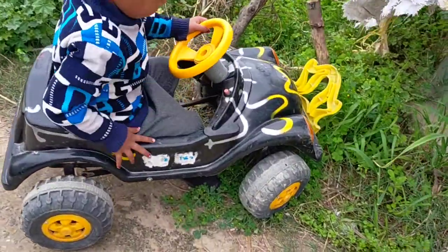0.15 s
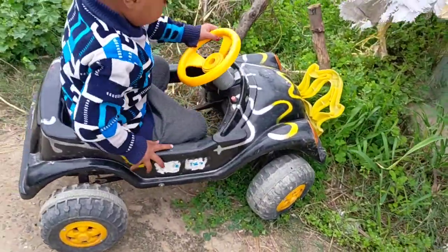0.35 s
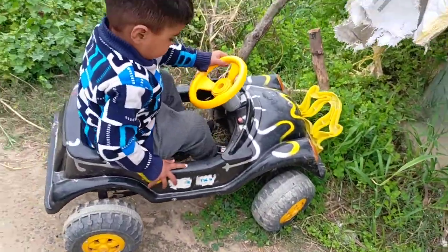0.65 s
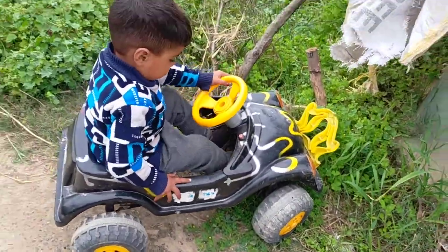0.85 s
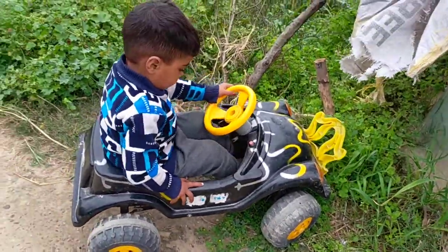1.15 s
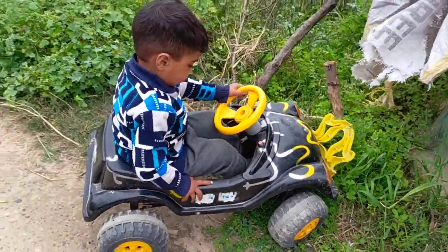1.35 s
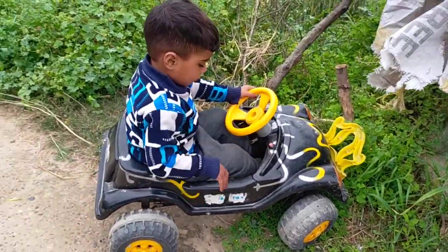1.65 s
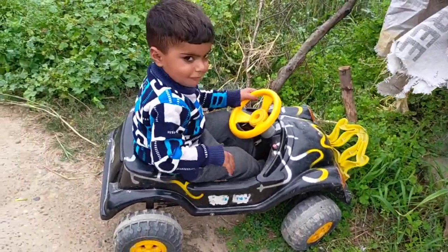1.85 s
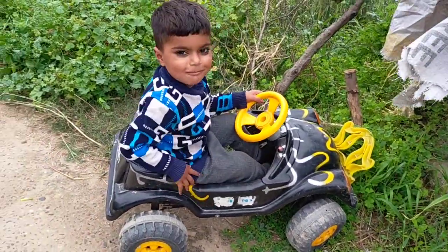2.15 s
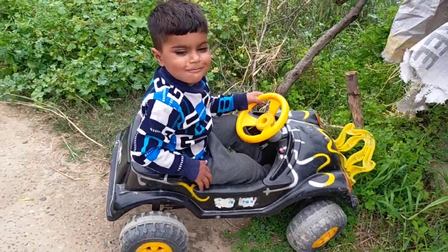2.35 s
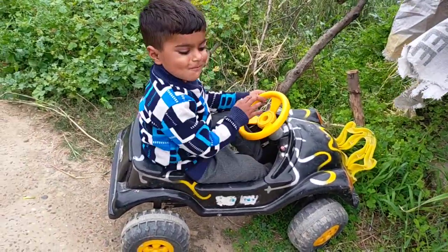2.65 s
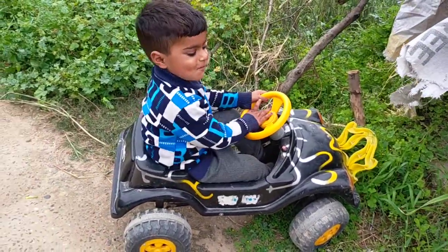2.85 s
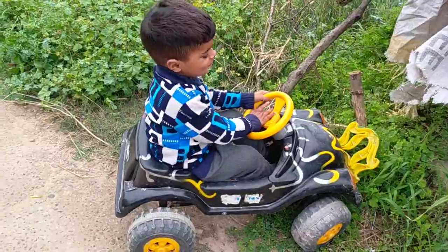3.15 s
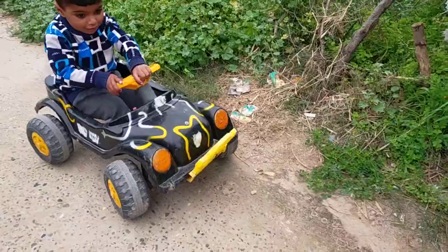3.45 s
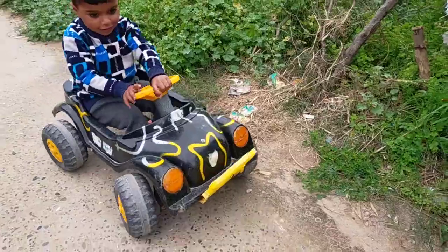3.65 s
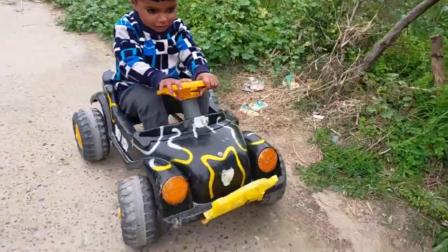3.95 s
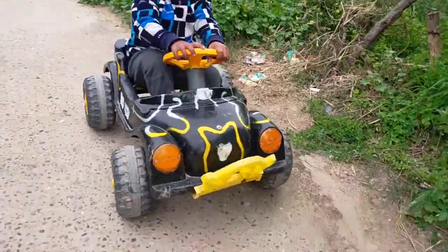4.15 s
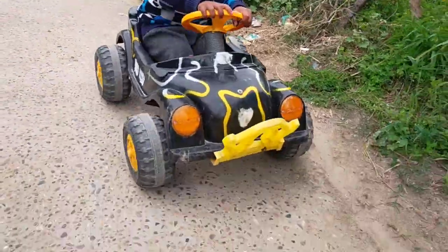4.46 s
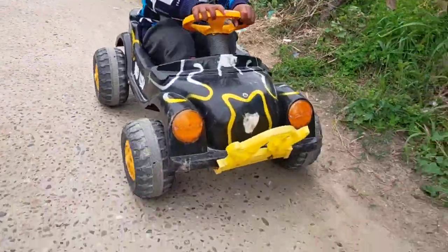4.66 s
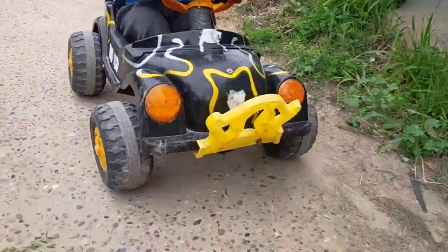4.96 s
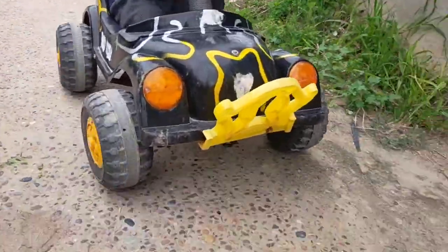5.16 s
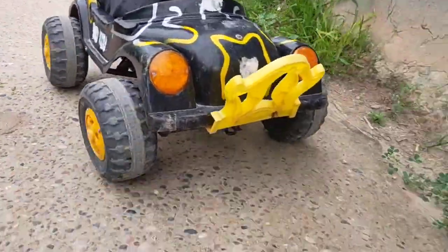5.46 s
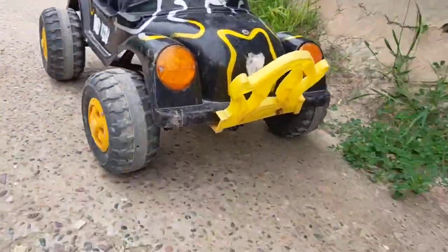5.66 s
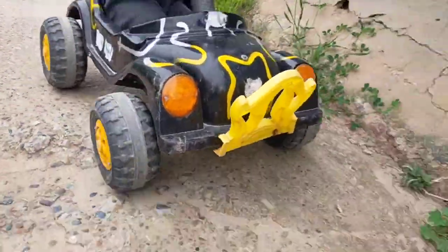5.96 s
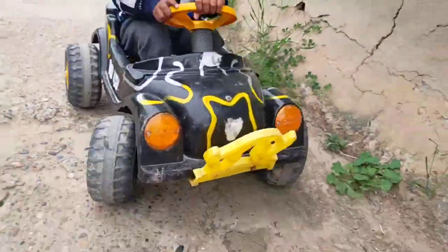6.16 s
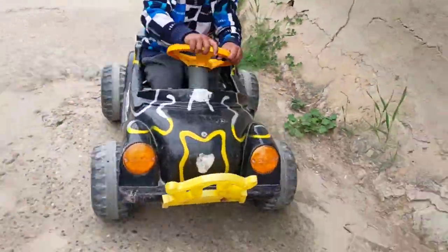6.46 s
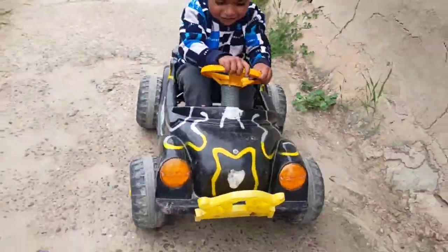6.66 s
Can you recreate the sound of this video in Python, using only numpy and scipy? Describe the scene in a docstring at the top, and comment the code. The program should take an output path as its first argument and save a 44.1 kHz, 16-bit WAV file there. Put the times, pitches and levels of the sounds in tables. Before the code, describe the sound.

Outdoors in a quiet lane, faint seat rustle and a short cluster of plastic steering clacks come first, then quiet and soft low bumps. A child's pedal car sets off with a groaning scrape and rolls closer over pebbly concrete: hollow rumble, irregular knocks, rattling shell, crunching grit, and a dry axle squealing about twice a second. Finally low thumps and air buffet the close handheld microphone.

```python
"""Soft bumps come first, then clacks of steering: a child's plastic pedal car stands in a quiet lane.
It sets off and rolls closer over pebbly concrete. Random contacts excite the dying modes of its hollow wheels
and shell; each stone sets loose parts striking one another, a loose panel slaps and grit snaps.
Stick-slip friction makes the dry axle groan, then squeal about twice a second.
At the end bumps and shaped noise buffet the microphone, over a steady outdoor wash."""
import sys
import numpy as np
from scipy import signal
from scipy.fft import irfft, next_fast_len
from scipy.io import wavfile

SR = 44100
rng = np.random.default_rng(int(sys.argv[2]) if len(sys.argv) > 2 else 0)


def wav_out(sig):
    """Save sig, one row per channel (or a flat mono array), as 16-bit PCM at SR to the path in sys.argv[1]."""
    wavfile.write(sys.argv[1], SR, np.round(np.clip(np.atleast_2d(sig).T, -1, 1) * 32767).astype(np.int16))


N = 299880
TIME = np.arange(N) / SR
EDGE_HZ = 15900  # upper band limit


def amp(db):
    """Logarithmic level: decibels become an amplitude gain."""
    return 10 ** (np.asarray(db) / 20)


def unit(x):
    """Normalisation: scales a sound to rms 1."""
    return x / np.sqrt(np.mean(x ** 2) + 1e-20)


def follow(rows, t=TIME):
    """Linear interpolation: the columns of a curve at times t."""
    s, *columns = np.transpose(rows)
    return [np.interp(t, s, c) for c in columns]


def read(points, hz):
    """Log-frequency interpolation: the level of a spectrum at the frequencies hz."""
    f, db = np.transpose(points)
    return np.interp(np.log(hz + 1), np.log(f + 1), db)


def add(mix, s, sound):
    """Superposition: mixes a sound in at time s."""
    part = mix[max(round(s * SR), 0):][:len(sound)]
    part += sound[:len(part)]


def colour(x, points):
    """Minimum-phase filtering: the spectrum's gain fixes a causal response, found by Hilbert transform."""
    size = 4096
    hz = abs(np.fft.fftfreq(size, 1 / SR))
    log_gain = np.log(amp(np.maximum(read(points, hz), -100)))
    taps = np.fft.ifft(np.exp(np.conj(signal.hilbert(log_gain)))).real
    return signal.fftconvolve(x, taps[:size // 2])[:len(x)]


def cut(x, hz, kind, order=3):
    """Butterworth filtering: low-pass or high-pass."""
    sections = signal.butter(order, min(hz, SR / 2 - 1), kind, fs=SR, output="sos")
    return signal.sosfilt(sections, x)


def wander(size, hz):
    """Band-limited noise: slow chance of rms about 1, up to about hz."""
    f = np.fft.rfftfreq(next_fast_len(size + SR // 4), 1 / SR)
    bins = rng.standard_normal(len(f)) + 1j * rng.standard_normal(len(f))
    return unit(irfft(bins / (1 + (f / hz) ** 4)))[:size]


def hops(size, per_s):
    """Random step process: a value that holds for a moment, then jumps to another."""
    return rng.standard_normal(size)[np.cumsum(rng.random(size) < per_s / SR) % size]


def ring(t60, direct, size=3000):
    """Impulse response of a plastic part: the blow itself, then a dense cloud of dying modes."""
    tail = rng.standard_normal(size) * amp(-60 * np.arange(size) / SR / t60)
    tail /= np.linalg.norm(tail)
    tail[0] += direct
    return tail


def contacts(per_s, spread_db, t60, direct, count=4):
    """Random impulse excitation: contacts of uneven size, each of count parts ringing in its own way."""
    out = np.zeros(N)
    for _ in range(count):
        size = amp(spread_db * np.minimum(rng.exponential(1, N), 3.5)) * rng.choice([-1, 1], N)
        hits = size * (rng.random(N) < per_s / count / SR)
        out += signal.oaconvolve(hits, ring(t60, direct))[:N]
    return out


FIRST_CONTACT = 1.38  # size of the first blow; the others scatter about 1 and then die


def flurry(length, per_s, spread_db, size=5000):
    """Repeated impact: loose parts strike each other in a quick, dying run of blows."""
    t = np.arange(size) / SR
    blows = amp(spread_db * rng.standard_normal(size)) * rng.choice([-1, 1], size)
    dying = np.sqrt(np.maximum(1 - (t / length) ** 2, 0))
    blows *= (rng.random(size) < per_s / SR) * dying
    blows[0] = FIRST_CONTACT
    return blows


def struck(blows, spectrum, t60, direct):
    """Convolution of blows with a modal response: a plastic part rings under them."""
    return colour(signal.fftconvolve(blows, ring(t60, direct))[:len(blows)], spectrum)


def burst(x, length):
    """Energy normalisation: scales a short sound to rms 1 over its length plus 2 ms."""
    return x * np.sqrt((length + 0.002) * SR / (np.sum(x ** 2) + 1e-20))


def throb(rows, sag, size=5000):
    """Damped resonance: a few cycles that swell, sag in pitch and die."""
    out, t = np.zeros(N), np.arange(size) / SR
    for s, hz, db, cycles in rows:
        u = t * hz / cycles  # 1 at the height of the swell, where the pitch is hz
        turns = np.cumsum(hz * (1 + sag * (np.exp(-u / 2) - np.exp(-1 / 2)))) / SR
        add(out, s, amp(db) * (u * np.exp(1 - u)) ** 1.46 * np.sin(2 * np.pi * turns))
    return out


FULL_DB = -22.5  # level of the roll at full pace
# how hard the wheels roll, growing with speed and nearness: start_s [s], level_db [dB]
ROLL = [(3.4, -55), (3.53, -40.5), (3.68, -42), (3.9, -33), (4.25, -36.5), (4.45, -33), (4.6, -30.5),
        (4.85, -32.5), (5.13, -25.5), (5.42, -23.5), (6.3, -22.5), (6.8, -26.5)]


def effort(t=TIME):
    """Relative level: the roll in dB against full pace."""
    return follow(ROLL, t)[0] - FULL_DB


SKIP_S, SKIP_DB = 0.021, -1  # how long the tread is in the air before a stone; change of the roll meanwhile
# stones jolt the body: start_s [s], level_db [dB], knock_db of the hollow body [dB re level_db], rattle_s [s]
JOLTS = [(3.693, -25, -24, 0.016), (3.770, -37, 28, 0.013), (3.806, -35.5, 10, 0.011),
         (3.842, -26, 24.5, 0.013), (3.892, -25.5, -2, 0.01), (3.917, -35.5, 17, 0.019),
         (3.947, -27, 23, 0.02), (4.029, -29, 6, 0.019), (4.063, -27, 10, 0.0032), (4.176, -30, -5, 0.024),
         (4.364, -33, -1, 0.013), (4.462, -20.5, -2, 0.0082), (4.552, -23, -11, 0.0076),
         (4.562, -27.5, 6, 0.019), (4.622, -29.5, -2.5, 0.018), (4.732, -31, 3, 0.028),
         (4.907, -25, 3, 0.01), (4.961, -28.5, -4, 0.016), (5.027, -21, -3, 0.02), (5.073, -25, -2, 0.017),
         (5.163, -27.5, 8.5, 0.021), (5.190, -23, 4.5, 0.021), (5.260, -31.5, 8.5, 0.035),
         (5.328, -21, -0.5, 0.016), (5.388, -28, 3, 0.01), (5.448, -20, -13, 0.0084),
         (5.493, -20, -5, 0.016), (5.533, -19.5, -4.5, 0.013), (5.573, -27.5, -1, 0.017),
         (5.756, -19, -9, 0.0064), (5.832, -23, -3, 0.026), (6.103, -18.5, -7.5, 0.032),
         (6.143, -22, 1, 0.028), (6.174, -24, -4, 0.017), (6.303, -34, 8, 0.0099), (6.368, -16, 1, 0.00097),
         (6.379, -21, -3, 0.017), (6.423, -21, 0, 0.025), (6.488, -15.5, -1.5, 0.0028),
         (6.555, -38.5, 22.5, 0.02), (6.688, -38.5, 20, 0.053), (6.742, -23.5, -1, 0.028),
         (6.772, -36, 22, 0.015)]


def skipping():
    """Loss of contact: the tread lifts clear for an instant before it lands on each stone."""
    lift = np.zeros(N)
    for s, *_ in JOLTS:
        add(lift, s - SKIP_S, signal.windows.tukey(round(SKIP_S * SR), .5))
    return amp(SKIP_DB * np.minimum(lift, 1))


START_S, SPIN_UP_S = 3.322, 0.2  # the car sets off and gathers way
# each layer of the roll: (dB at full pace, dB it gains for each dB of roll)
RUMBLE, DRUM, CHATTER, CRUNCH = (-32.5, 1.32), (-23.5, 1), (-26.5, 0.94), (-33, 0.86)
# spectrum of low thuds and moving air: pitch_hz [Hz], level_db [relative dB per Hz]
LOW = [(18, -28), (30, -47), (71, -6.5), (106, 3.5), (155, 4.5), (200, -8.5), (254, -13.5), (330, -0.5),
       (430, -48), (730, -120)]
# spectrum of the hollow plastic shell: pitch_hz [Hz], level_db [relative dB per Hz]
SHELL = [(100, -48.5), (170, 4), (250, 3), (320, 3), (410, 5.5), (490, 3), (720, 2), (1050, -8.5),
         (1680, -3.5), (2860, -10.5), (4400, -26), (5850, -25), (9900, -120)]
# spectrum of grit and sharp edges: pitch_hz [Hz], level_db [relative dB per Hz]
GRIT = [(60, -14), (500, -12.5), (1760, 6.5), (3000, 0.5), (4230, -1), (4700, -5), (6000, -8), (8460, 4),
        (13200, -14), (15100, -6), (16000, -29)]


def rolling():
    """Roughness excitation: pebbles drum on hollow wheels, the shell chatters, grit crunches under the tread."""
    moving = np.clip((TIME - START_S) / SPIN_UP_S, 0, 1) ** 0.068
    rumble = colour(contacts(per_s=380, spread_db=0.5, t60=0.021, direct=0.98), LOW)
    drum = colour(contacts(per_s=900, spread_db=4.5, t60=0.06, direct=0.49), SHELL)
    drum = cut(cut(drum, 1510, "low"), 230, "high")
    chatter = colour(contacts(per_s=500, spread_db=4, t60=.035, direct=.8), SHELL)
    chatter = cut(chatter, 1000, "high")
    grit = colour(contacts(per_s=980, spread_db=8.0, t60=0.072, direct=0.37), GRIT)
    layers = (rumble, RUMBLE), (drum, DRUM), (chatter, CHATTER), (grit, CRUNCH)
    roll = sum(unit(sound) * amp(db + growth * effort()) for sound, (db, growth) in layers)
    return moving * skipping() * roll


JOLT_RATTLE_PER_S = 800  # mean rate of the blows in a rattle
JOLT_EDGE_DB = -9.5  # the parts' sharp edges, relative to the jolt


def jolts(deep_hz, deeper_per_db):
    """Impact of a stone: knock, clatter and tick; the harder the car rolls, the deeper the modes it reaches."""
    out = np.zeros(N)
    for s, db, knock_db, length in JOLTS:
        blows = flurry(length, per_s=JOLT_RATTLE_PER_S, spread_db=4.0)
        shell = struck(blows, SHELL, t60=0.051, direct=0.83)
        edge = struck(blows, GRIT, t60=0.11, direct=1.0)
        lowest_hz = deep_hz * amp(-deeper_per_db * effort(s))
        knock = cut(cut(shell, 690, "low"), lowest_hz, "high", order=2)
        clatter = cut(shell, 714, "high")
        for part, part_db in (knock, knock_db), (clatter, 0), (edge, JOLT_EDGE_DB):
            add(out, s, amp(db + part_db) * burst(part, length))
    return out


# a loose panel now and then slaps the frame as the car rolls:
# start_s [s], main mode pitch_hz [Hz], level_db [dB]
SLAPS = [(4.733, 1670, -13), (5.077, 1760, -10.5), (5.533, 1740, -16), (6.020, 1710, -11.5),
         (6.109, 1840, -6), (6.175, 1970, -8), (6.365, 836, -6.5)]
# modes of that panel: ratio to the main mode [1], level_db [dB re the slap]
PANEL = [(.8, -4), (1, 1), (1.23, -4), (1.62, -9.5)]


def slaps(t60, scatter, size=2000):
    """Modal synthesis: each slap rings the panel's short modes, a little differently at every spot."""
    out, t = np.zeros(N), np.arange(size) / SR
    for s, hz, db in SLAPS:
        for ratio, mode_db in PANEL:
            mode_hz = hz * ratio * (1 + scatter * rng.standard_normal())
            decay = amp(db + mode_db - 60 * t / t60)
            add(out, s, decay * rng.choice([-1, 1]) * np.sin(2 * np.pi * mode_hz * t))
    return out


# grains of grit snap: start_s [s], level_db [dB], crackle_s [s]
SNAPS = [(2.657, -54, .002), (3.955, -21, 0.0062), (4.063, -33.5, 0.0033), (4.076, -29.5, 0.0013),
         (5.111, -25, 0.0017), (5.141, -23.5, 0.0018), (5.606, -24.5, 0.015), (5.678, -26.5, .008),
         (6.002, -22, .002), (6.249, -28.5, 0.04)]


def snaps():
    """Brittle fracture: grit cracks with a short, bright tick."""
    out = np.zeros(N)
    for s, db, length in SNAPS:
        blows = flurry(length, per_s=790, spread_db=10.0)
        crack = struck(blows, GRIT, t60=0.022, direct=0.19)
        add(out, s, amp(db) * burst(crack, length))
    return out


def slipping(hz, unsteady, jitter_hz, hops_per_s):
    """Slip counting: integrates the slip rate of a dry contact, which jitters and hops as it shifts."""
    stray = wander(len(hz), jitter_hz) + .6 * hops(len(hz), hops_per_s)
    return np.cumsum(hz * (1 + unsteady * stray)) / SR


def glides(rows, steady, rough_per_rise):
    """Frequency glide: each friction note slides evenly; the further it slides, the rougher it is."""
    for s, length, first_hz, last_hz, db in rows:
        t = np.arange(0, length, 1 / SR)
        hz = first_hz + (last_hz - first_hz) * t / length
        yield s, hz, db, steady + rough_per_rise * abs(last_hz / first_hz - 1)


def stick_slip(notes, harmonics_db, jitter_hz, flutter_db):
    """Stick-slip friction: a few harmonics that flutter as the contact bites and lets go."""
    out = np.zeros(N)
    for s, hz, db, unsteady in notes:
        turns = slipping(hz, unsteady, jitter_hz, hops_per_s=70)
        tone = np.zeros(len(hz))
        for k, harmonic_db in enumerate(harmonics_db, 1):
            flutter = amp(harmonic_db + flutter_db * wander(len(hz), hz=80))
            tone += flutter * np.sin(2 * np.pi * k * turns)
        add(out, s, unit(tone) * amp(db) * signal.windows.tukey(len(hz), .2))
    return out


# spectrum of the axle's hub: pitch_hz [Hz], level_db [relative dB per Hz]
HUB = [(600, -30), (2200, 6), (3600, -6), (5800, 2), (8500, 11.5), (10500, 1), (15000, -6)]


def scrape(hz, hiss_db, count=19):
    """Harmonic friction: strands bend with the slip rate, each catching and breaking off alone, over hiss."""
    strands = np.zeros(len(hz))
    for k in range(2, count):
        turns = slipping(k * hz, unsteady=.024, jitter_hz=450, hops_per_s=55)
        grip = amp(8 * np.minimum(wander(len(hz), hz=45), 1.4))
        strands += grip * np.sin(2 * np.pi * turns) * (k * hz < EDGE_HZ)
    hiss = rng.standard_normal(len(hz)) * amp(2 * wander(len(hz), hz=400))
    return unit(colour(unit(strands) + amp(hiss_db) * unit(hiss), HUB))


RELEASE_S = 0.12  # the axle frees itself after the tightest point


def binding(tightest, lead):
    """Periodic binding: one turn's times and its slack, 1 when free and 0 at the tightest point."""
    t = np.arange(-lead, RELEASE_S, 1 / SR)
    return tightest + t, np.where(t < 0, -t / lead, t / RELEASE_S)


SLIP_HZ, SLIP_SAG = 1168, 0.19  # slips per s at the tightest point; share by which that falls when slack
RUB_SLACK_DB = -15.5  # level of the rubbing when slack, relative to the tightest point
# the axle scrapes through its first turn: start_s [s], slip_rate [slips per s], level_db [dB]
SCRAPE = [(3.323, 630, -51.5), (3.451, 620, -41.5), (3.581, 840, -36), (3.662, 610, -36), (3.75, 530, -61)]
# the axle binds once a turn: tightest_s [s], tightening_s [s], level_db of the dry rubbing when tightest [dB]
TURNS = [(4.58, 0.39, -32), (5.109, 0.3, -30), (5.58, 0.2, -31), (6.027, 0.28, -34.5), (6.45, 0.38, -41)]


def rubbing():
    """Load-dependent friction: a scrape, then binding once a turn, slipping faster and louder as it tightens."""
    out, t = np.zeros(N), np.arange(SCRAPE[0][0], SCRAPE[-1][0], 1 / SR)
    hz, db = follow(SCRAPE, t)
    add(out, t[0], amp(db) * scrape(hz, hiss_db=-2))
    for tightest, lead, db in TURNS:
        t, slack = binding(tightest, lead)
        rub = scrape(SLIP_HZ * (1 - SLIP_SAG * slack ** 2), hiss_db=-3)
        add(out, t[0], rub * amp(db + RUB_SLACK_DB * slack) * signal.windows.tukey(len(t), .2))
    return out


# the axle squeals, mostly upward: start_s [s], length_s [s], first_hz [Hz], last_hz [Hz],
# level_db before the high-pass [dB]
SQUEALS = [(4.293, 0.16, 3450, 4090, -42), (4.518, 0.044, 4780, 4920, -31.5),
           (4.615, .052, 5530, 4750, -39), (4.865, 0.088, 3720, 3920, -36), (4.94, 0.16, 4120, 4920, -33),
           (5.111, 0.07, 4940, 4740, -28.5), (5.432, 0.2, 4380, 4910, -35.5), (5.879, 0.2, 4340, 4780, -36),
           (6.37, 0.1, 4360, 4720, -37)]
# the axle catches for an instant: start_s [s], pitch_hz [Hz], level_db [dB], length_s [s]
CHIRPS = [(4.193, 4620, -36, 0.011), (4.42, 6010, -37, 0.045), (4.587, 7320, -34.5, .042),
          (5.045, 5320, -36.5, 0.068), (5.056, 7200, -33, .018), (5.176, 5630, -32.5, 0.026),
          (5.611, 5920, -35, 0.045), (5.813, 11310, -36.5, 0.075), (6.46, 5420, -37, 0.029)]
# the axle groans at low speed: start_s [s], length_s [s], first_hz [Hz], last_hz [Hz], level_db [dB]
GROANS = [(3.322, 0.077, 556, 770, -39.5), (3.37, 0.25, 1400, 1535, -43.5), (3.4, 0.064, 2880, 2780, -42.5),
          (3.405, 0.07, 1030, 722, -44), (3.463, .058, 940, 1245, -41.5), (3.598, 0.065, 2240, 1940, -46)]


def axle():
    """Self-excited friction: the dry axle groans and scrapes as it sets off, then rubs, squeals and catches."""
    held = [(s, length, hz, hz, db) for s, hz, db, length in CHIRPS]
    squeal = stick_slip(glides(SQUEALS, steady=.006, rough_per_rise=.15),
                        harmonics_db=[-4, 0, -16], jitter_hz=800, flutter_db=4.5)
    catches = stick_slip(glides(held, steady=.008, rough_per_rise=0),
                         harmonics_db=[0, -20], jitter_hz=900, flutter_db=4)
    groan = stick_slip(glides(GROANS, steady=.012, rough_per_rise=.07),
                       harmonics_db=[0, -13], jitter_hz=300, flutter_db=3)
    return cut(squeal, 4100, "high") + catches + groan + rubbing()


CLACK_CLATTER_DB = -4  # the column's clatter, relative to its knock
# the steering takes up its play: start_s [s], level_db [dB], edge_db [dB re level_db], rattle_s [s]
CLACKS = [(0.659, -50.5, 8.5, 0.0037), (.725, -49.5, -7, 0.0093), (.769, -45, -20, 0.011),
          (.79, -41.5, -5.5, 0.011), (0.879, -52, -20, .004), (0.911, -43.5, 6, 0.006),
          (.918, -36.5, 1.5, 0.01), (.998, -33, -30, 0.0058), (1.014, -38.5, -9, 0.0054),
          (1.022, -31.5, -5, 0.0076), (1.088, -53, -4.5, 0.024), (1.752, -52, -37, 0.0051)]
# the hollow body rings, after a steering clack or as the car rolls:
# start_s [s], pitch_hz [Hz], level_db [dB], swell [cycles]
RINGS = [(.9205, 710, -19, 4.6), (1.021, 3330, -30, 9.9), (1.026, 685, -29, 4.5), (1.59, 690, -46, 3.8),
         (4.075, 522, -26.5, 4.7), (4.083, 773, -23.5, 8.6), (4.43, 760, -21.5, 2.5)]
# spectrum of the steering column: pitch_hz [Hz], level_db [relative dB per Hz]
COLUMN = [(100, -23), (180, -4.5), (450, 1), (700, 3), (1300, -6), (2400, -5), (3300, -13.5), (4800, -24)]
# spectrum of the steering linkage: pitch_hz [Hz], level_db [relative dB per Hz]
LINKAGE = [(60, -28), (180, 11), (2500, -1.5), (3400, -5.5), (5550, -2), (8700, 4.5), (15000, -16)]


def steering_and_body():
    """Impact and resonance: the column knocks and clatters, the linkage ticks; the hollow body rings."""
    out = throb(RINGS, sag=0.027)
    for s, db, edge_db, length in CLACKS:
        blows = flurry(length, per_s=1300, spread_db=1.5)
        column = struck(blows, COLUMN, t60=0.064, direct=0.65)
        edge = struck(blows, LINKAGE, t60=0.052, direct=0.64)
        knock, clatter = cut(column, 1100, "low"), cut(column, 1200, "high")
        for part, part_db in (knock, 0), (clatter, CLACK_CLATTER_DB), (edge, edge_db):
            add(out, s, amp(db + part_db) * burst(part, length))
    return out


BUMP_CYCLES = 0.56  # cycles that a bump takes to swell
# soft bumps and puffs of air on the microphone: start_s [s], pitch_hz at the swell [Hz],
# envelope peak level_db before the high-pass [dB]
BUMPS = [(.13, 128, -45), (.31, 85, -46), (1.88, 113, -44.5), (2.580, 133, -29.5), (2.592, 148, -32),
         (2.718, 117, -33), (2.778, 125, -38), (2.832, 167, -36), (2.861, 144, -26.5), (2.914, 130, -34),
         (2.973, 115, -31.5), (6.47, 142, -11.5), (6.557, 179, -8), (6.692, 149, -3), (6.708, 157, -7.5),
         (6.771, 161, -11), (6.790, 163, -3)]
# air flutters round the microphone: start_s [s], end_s [s], level_db before the flutter [dB]
GUSTS = [(6.38, 6.632, -26), (6.656, 6.88, -18.5)]


def buffeting():
    """Pressure fluctuation: low puffs and a lumpy flutter of air on the microphone."""
    puffs = throb([(*bump, BUMP_CYCLES) for bump in BUMPS], sag=0.45)
    out = cut(puffs, 55, "high", order=2)
    for start, end, db in GUSTS:
        size = round((end - start) * SR)
        air = colour(rng.standard_normal(size), LOW)
        air = unit(cut(cut(air, 470, "low"), 110, "high"))
        lumps_db = 3 * wander(size, hz=22)
        add(out, start, air * amp(db + lumps_db) * signal.windows.tukey(size, .4))
    return out


# the child shifts in the seat: start_s [s], level_db [dB]
RUSTLE = [(.55, -60.5), (.6, -52), (1.1, -56.5), (1.3, -65), (2.5, -71.5), (2.7, -54.5), (3.2, -60.5)]


def seat():
    """Light sliding contact: clothes and hands rub on the plastic."""
    rub = colour(contacts(per_s=460, spread_db=2.0, t60=0.022, direct=0.49), COLUMN)
    return unit(rub) * amp(follow(RUSTLE)[0])


LANE_DB = -58  # rms level of the wash
# spectrum of the outdoor wash: pitch_hz [Hz], level_db [relative dB per Hz]
LANE = [(18, -62), (30, -23), (79, 7.5), (266, -2.5), (700, 0.5), (1430, 1), (2800, -6.5), (5500, -18),
        (8300, -12.5), (11500, -31.5), (16000, -45)]


def lane():
    """Diffuse background: filtered noise makes a steady distant outdoor wash."""
    return unit(colour(rng.standard_normal(N), LANE)) * amp(LANE_DB)


def scene():
    """Superposition of the car, its steering and axle, the air and the lane."""
    stones = jolts(deep_hz=142, deeper_per_db=4.5) + slaps(t60=0.012, scatter=0.013) + snaps()
    return (lane() + seat() + steering_and_body() + rolling() + stones + axle() + buffeting())[None]


def record(dry):
    """Band limiting: the microphone loses the deepest bass, and a steep low-pass ends the treble."""
    low_pass = signal.firwin(511, EDGE_HZ, window=("kaiser", 9), fs=SR)
    return signal.oaconvolve(cut(dry, 46, "high", order=1), low_pass[None], "same")


dry = scene()
out = record(dry)
wav_out(out)
```